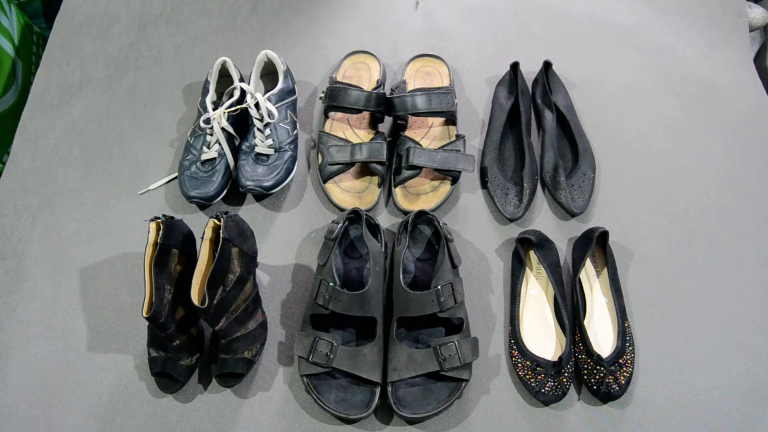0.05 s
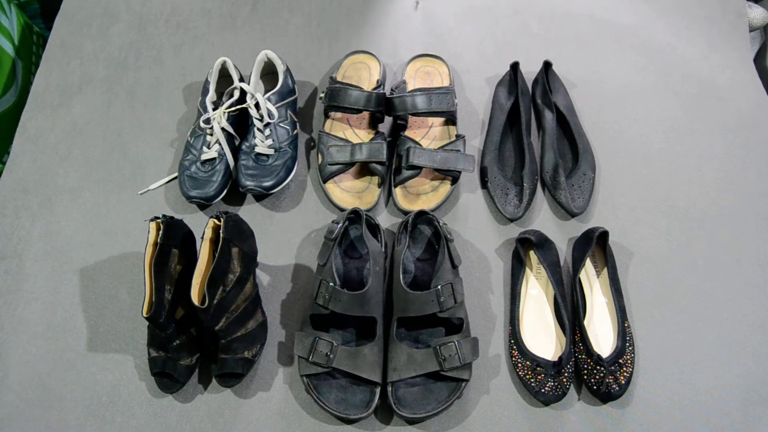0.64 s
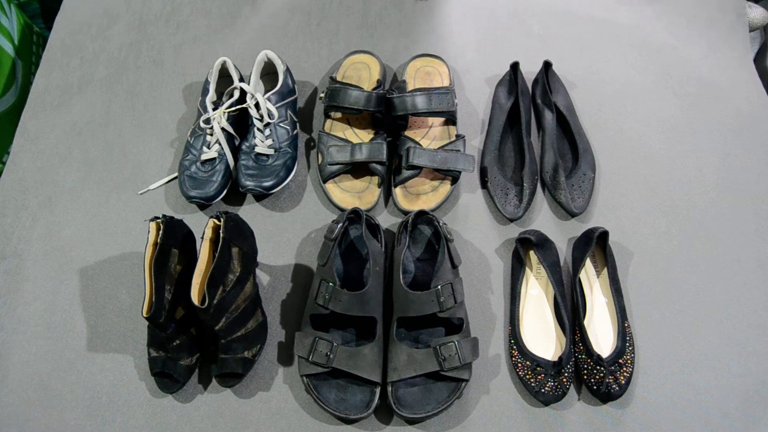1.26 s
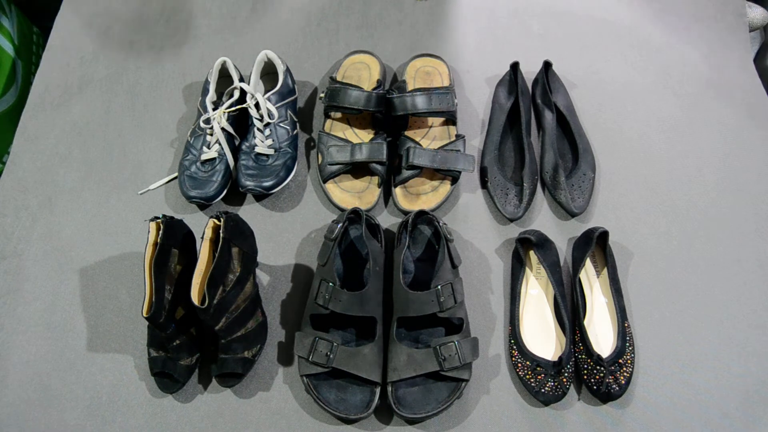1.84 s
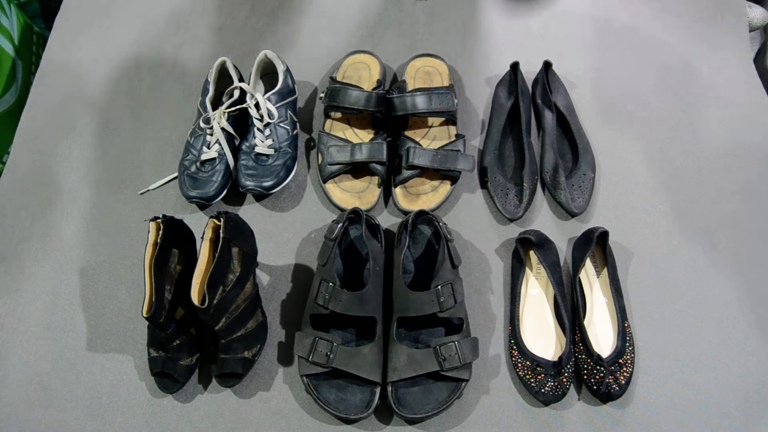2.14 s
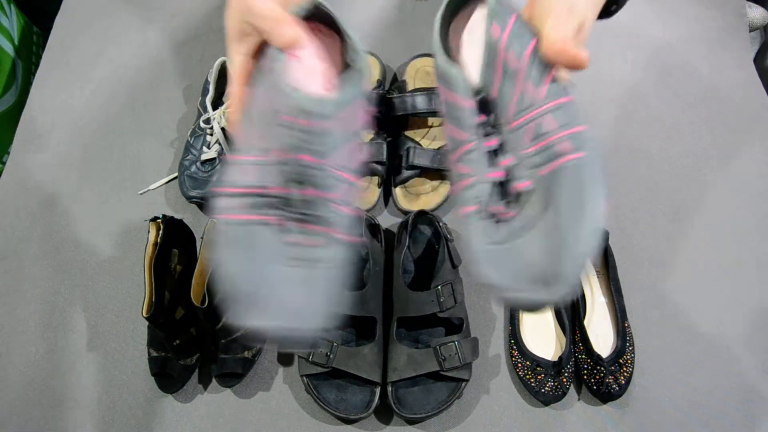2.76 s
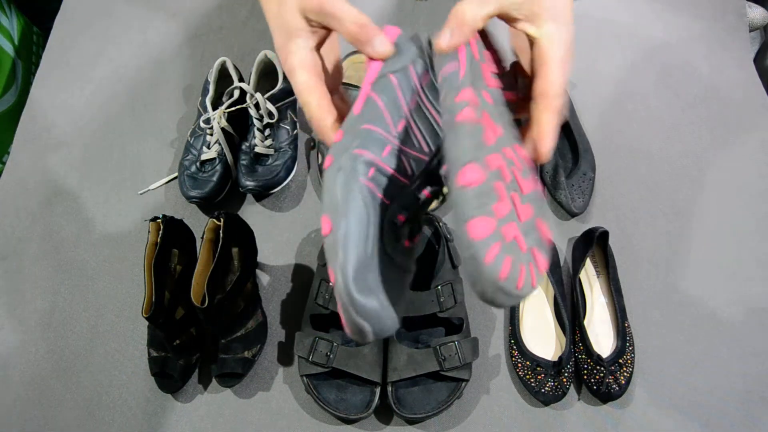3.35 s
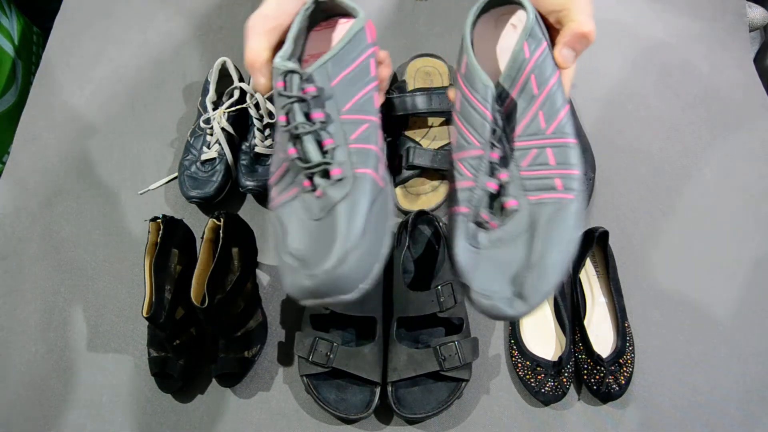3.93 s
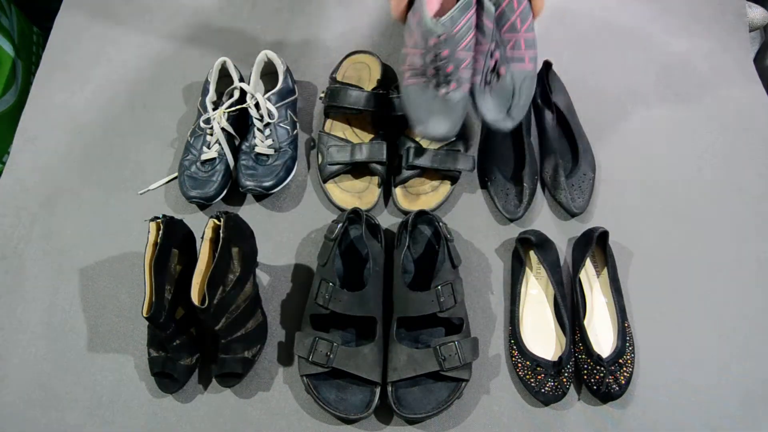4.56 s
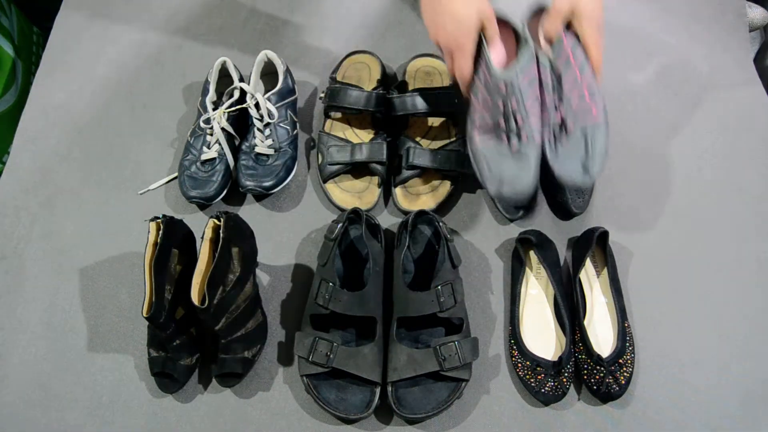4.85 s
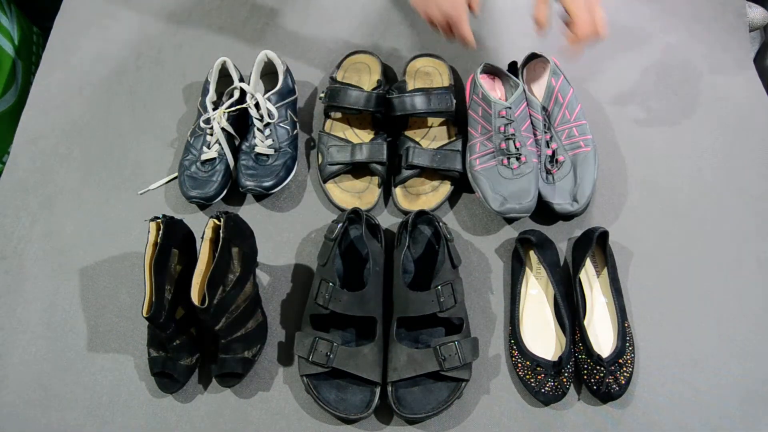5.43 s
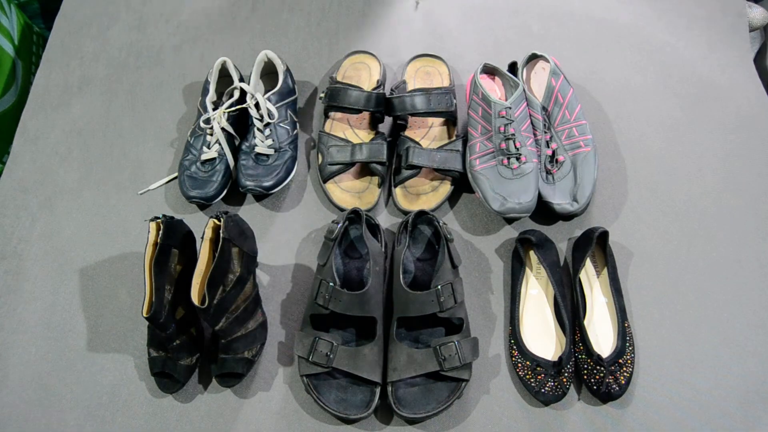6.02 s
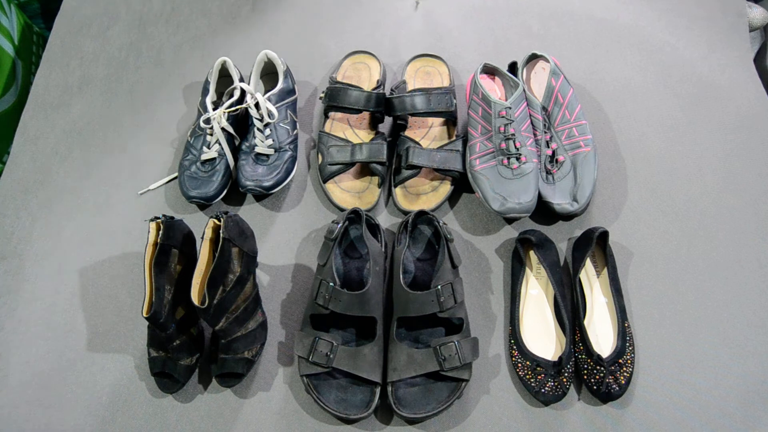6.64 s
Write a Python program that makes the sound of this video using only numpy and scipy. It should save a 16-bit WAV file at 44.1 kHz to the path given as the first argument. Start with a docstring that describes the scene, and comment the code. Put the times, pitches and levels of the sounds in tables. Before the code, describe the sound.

A pair of soft rubber-soled shoes is handled close by in a small, quiet room, with sleeves swishing softly at every reach. In the first half second the shoes are picked up with a cluster of hollow knocks and scuffs. Faint dull bumps and rubbing continue until about 1.7 seconds, and a single knock comes just after 2 seconds. Near 2.8 seconds the shoes are clapped together with a short, hollow pop, the loudest sound. They are turned over with quiet rubbing, then a few light knocks around 4 seconds and a sharp click. At about 4.9 seconds the soles patter onto a table, whose top gives a brief low shudder. Sleeves swish again around 5.5 seconds. From 6 seconds on there is more scuffing, a few dull bumps and two crisp ticks of lace toggles, near 6.1 and 6.5 seconds.

```python
"""A pair of soft rubber-soled shoes is handled in a small, quiet room; sleeves swish with every reach.
First the shoes are picked up, knocking and scuffing. Near 2.8 s they are clapped together with a pop:
the air inside them rings while the soles slap. They are turned over with more knocks and a sharp click.
Near 4.9 s they are set down, and the soles patter onto a table and shake its top.
Last come more rubbing, a few dull bumps and the ticks of lace toggles and fastenings."""
import sys
import numpy as np
from scipy import signal
from scipy.fft import rfft, irfft, next_fast_len
from scipy.io import wavfile

SR = 44100
rng = np.random.default_rng(int(sys.argv[2]) if len(sys.argv) > 2 else 0)


def unload_wav(signal):
    """Save mono or channel-first audio to the path in sys.argv[1] as 16-bit WAV at rate SR, clipped to [-1, 1]."""
    wavfile.write(
        sys.argv[1],
        SR,
        np.round(np.clip(np.atleast_2d(signal).T, -1, 1) * 32767).astype(np.int16),
    )


N = 294588
TIME = np.arange(N) / SR
HIT_TIME = TIME[:SR // 2]   # half a second, long enough for one hit to die away


def from_db(db):
    """Turn decibels into a number to multiply by."""
    return 10 ** (np.asarray(db) / 20)


def rms_one(x):
    """Scale a sound so its average strength (rms) is 1."""
    return x / np.sqrt(np.mean(x ** 2) + 1e-20)


def peak_one(x):
    """Scale a sound so its biggest swing is 1."""
    return x / (np.abs(x).max() + 1e-20)


def add(out, start_s, sound):
    """Mix a sound into out, beginning at start_s."""
    at = max(0, round(start_s * SR))
    out[at:at + len(sound)] += sound[:max(0, N - at)]


def keep_band(x, kind, edge_hz, order=2):
    """Let the "low", "high" or middle ("band") pitches through."""
    return signal.sosfilt(signal.butter(order, edge_hz, kind, fs=SR, output="sos"), x)


def colour(x, spectrum, tilt_db=0):
    """Shape the tone with (pitch_hz, level_db) points; tilt_db brightens it by that much per octave."""
    size = 2 * next_fast_len(len(x) // 2 + 2048)
    octave = np.log2(np.maximum(np.arange(size // 2 + 1) * SR / size, 10))
    hz, db = np.transpose(spectrum)
    gain = from_db(np.interp(octave, np.log2(hz), db) + tilt_db * (octave - 10))
    # these steps keep the filter from sounding before the hit (minimum phase)
    cepstrum = irfft(np.log(gain))
    cepstrum[1:size // 2] *= 2
    cepstrum[size // 2 + 1:] = 0
    return irfft(rfft(x, size) * np.exp(rfft(cepstrum)))[:len(x)]


def fade(fade_s):
    """A level that drops by 60 dB in fade_s seconds."""
    return np.exp(-np.log(1000) * HIT_TIME / fade_s)


def ring(pitch_hz, fade_s):
    """One pure tone that dies away."""
    return np.sin(2 * np.pi * pitch_hz * HIT_TIME) * fade(fade_s)


def swell(t, rise_s, fall_s):
    """A stroke gathers speed up to t = 0 and slows down again."""
    width_s = np.where(t < 0, rise_s, fall_s)
    return np.exp(-np.minimum((t / width_s) ** 2, 50))


def slips(count, per_s, spread_db):
    """Rubbing is a stream of tiny slips of uneven size."""
    sizes = from_db(spread_db * np.minimum(rng.exponential(1, count), 4))
    return rms_one(sizes * rng.standard_normal(count) * (rng.random(count) < per_s / SR))


def contact(spectrum, fade_s, crumble, tilt_db=0):
    """A first sharp touch, then a brief crush of smaller ones."""
    force = crumble * rng.standard_normal(len(HIT_TIME)) * fade(fade_s)
    force[0] += 1
    return peak_one(colour(force, spectrum, tilt_db))


def gliding_band(noise, pitch_hz, width_hz):
    """Keep only the part of a noise that lies around a moving pitch."""
    turn = np.exp(2j * np.pi * np.cumsum(pitch_hz) / SR)
    return rms_one((keep_band(noise / turn, "low", width_hz / 2) * turn).real)


def still_air():
    """The faint, steady hush of the room."""
    # tone of the hush: pitch_hz, level_db
    hush_tone = [(25, -1.5), (80, -7.5), (160, -2.5), (350, 3.5), (700, 2.5), (1500, -5), (3000, -9.5),
                 (6000, -18.5), (10000, -21)]
    return from_db(-65.5) * rms_one(colour(rng.standard_normal(N), hush_tone))


def room(x):
    """Sound bounces off two close surfaces, scatters off the things around and leaves a faint tail."""
    # echoes from the close surfaces: delay_s, level_db
    echoes = [(.0066, -24.5), (0.0155, -27)]
    out, count = np.zeros(N), len(HIT_TIME)
    build_up = 1 - np.exp(-(HIT_TIME / 0.0017) ** 2)
    scatter = (fade(0.18) + from_db(-14) * fade(0.2)) * build_up
    for start in range(0, N, count // 2):   # a fresh scatter each time, since the shoes move
        tail = rng.standard_normal(count) * scatter
        bounces = from_db(-6.5) * tail / np.sqrt(np.sum(tail ** 2))
        for delay_s, level_db in echoes:
            bounces[round(delay_s * SR)] += from_db(level_db)
        stretch = x[start:start + count]
        add(out, start / SR, signal.fftconvolve(stretch * np.hanning(count)[:len(stretch)], bounces))
    return x + keep_band(out, "low", 7000, order=1)


def sleeves():
    """Fine cloth slides in a smooth hiss that swells with each reach and grows brighter with speed."""
    # reaches of an arm: fastest_s, level_db, rise_s, fall_s
    reaches = [(.17, -44.5, 0.078, 0.17), (.5, -55, 0.18, 0.22), (.84, -53.5, 0.099, 0.19),
               (1.1, -51.5, 0.22, 0.18), (1.41, -54.5, 0.12, 0.079), (2.032, -51, 0.5, 0.33),
               (2.5, -59.5, 0.13, 0.45), (2.96, -57.5, 0.11, .1), (3.27, -60.5, 0.15, 0.063),
               (3.725, -64, 0.085, 0.057), (4.03, -59.5, 0.22, .2), (4.371, -53.5, 0.23, 0.17),
               (4.81, -53.5, 0.23, 0.18), (5.08, -65.5, .07, .08), (5.27, -62.5, 0.11, .1),
               (5.5, -51.5, 0.15, 0.17), (5.68, -50, 0.11, 0.16), (6.22, -55, 0.46, .24),
               (6.68, -53.5, 0.11, .1)]
    # tone of sliding cloth: pitch_hz, level_db
    cloth_tone = [(100, -24), (250, -11.5), (600, -2.5), (1100, 0), (1800, 0.5), (2600, -1), (4300, -4),
                  (6500, -11), (10000, -14.5)]
    # a band of hiss that glides through two long swishes: time_s, pitch_hz, relative_db
    glide_path = [(1.70, 1600, -23), (1.80, 1800, -2.5), (1.89, 2130, 2), (1.98, 2340, -11),
                  (2.2, 2700, -25), (5.40, 2440, -16), (5.53, 2500, -6.5), (5.67, 2730, -6.5),
                  (5.73, 1780, -4.5), (5.84, 1490, -28)]
    power = sum((from_db(db) * swell(TIME - s, rise, fall)) ** 2 for s, db, rise, fall in reaches)
    level_db = 10 * np.log10(power)
    speed = np.clip((level_db + 59) / 13, 0, 1)   # 0 is slow, 1 is fast
    weave = slips(N, per_s=20000, spread_db=1.0)
    slow_rub = rms_one(colour(weave, cloth_tone, tilt_db=-1.94))
    fast_rub = rms_one(colour(weave, cloth_tone))
    time_s, pitch_hz, relative_db = np.transpose(glide_path)
    glide = gliding_band(rng.standard_normal(N), np.interp(TIME, time_s, pitch_hz), width_hz=870)
    glide *= from_db(np.interp(TIME, time_s, relative_db))
    return from_db(level_db) * ((1 - speed) * slow_rub + speed * fast_rub + glide)


def scuffs():
    """Rubber and fabric rub in coarse slips; each rub swells, then fades a little more slowly."""
    # rubs of the shoes: loudest_s, level_db (before the lift), rise_s, tilt_db (per octave)
    rubs = [ (.03, -52.5, 0.11, -2), (.222, -45.5, 0.031, 1.2), (.295, -47.5, 0.026, .5),
            (.353, -39.5, .015, -1.5), (.388, -40.5, .018, -1), (.435, -48.5, .017, -2.5),
            (.772, -52.5, 0.011, .5), (.84, -51.5, .04, -1.5), (1.058, -46, 0.024, -2.5),
            (1.118, -45, .013, -5), (1.203, -50, 0.016, -0.5), (1.707, -47.5, .019, 0),
            (2.629, -56.5, 0.017, -1), (2.775, -54, 0.057, 0), (3.012, -52, 0.026, -1),
            (3.07, -56.5, .018, -1.5), (3.218, -55, .025, -2), (3.335, -62.5, .021, 2.5),
            (3.826, -58, .011, -1), (3.862, -62.5, 0.011, -.5), (3.928, -48, 0.0055, -.5),
            (3.952, -53, 0.016, -0.5), (4.106, -47, .01, -1.5), (4.125, -55, 0.016, -1.5),
            (4.926, -45.5, 0.011, 3), (5.782, -46.5, .015, -4), (6.014, -58, 0.0066, 5),
            (6.088, -50.5, 0.037, 1.5), (6.184, -40, .025, 0), (6.269, -53, 0.18, 11.5),
            (6.393, -47, .009, 0.5), (6.412, -43, 0.012, 0), (6.44, -42.5, 0.017, 0.7),
            (6.515, -51.5, 0.057, 1), (6.608, -50, 0.0068, 2.5), (6.66, -55, 0.042, 3.5)]
    # tone of a rubbing shoe: pitch_hz, level_db
    rub_tone = [(70, -20.5), (200, -8), (450, 4.5), (800, 1), (1300, 3), (2500, -2), (4500, -6.5),
                (7000, -10), (10000, -11.5)]
    out, lift_db = np.zeros(N), 1.5
    for loudest_s, level_db, rise_s, tilt_db in rubs:
        fall_s = 1.31 * rise_s
        t = TIME[(TIME > loudest_s - 3 * rise_s) & (TIME < loudest_s + 3 * fall_s)] - loudest_s
        grain = rms_one(colour(slips(len(t), per_s=5500, spread_db=1.3), rub_tone, tilt_db))
        add(out, loudest_s + t[0], from_db(level_db + lift_db) * swell(t, rise_s, fall_s) * grain)
    return out


def bumps():
    """A soft, drawn-out push into a shoe that barely rings, with a deep thud beneath."""
    # dull bumps and shuffles: start_s, level_db, pitch_hz
    pushes = [(.146, -45, 355), (0.216, -36.5, 453), (0.329, -45, 262), (.51, -50.5, 270), (.791, -40, 330),
              (1.102, -39, 403), (1.156, -38.5, 445), (1.199, -48, 270), (1.24, -43, 494),
              (1.503, -48.5, 484), (1.576, -45.5, 497), (1.679, -50, 298), (2.304, -53, 280),
              (2.825, -40, 494), (3.225, -47, 470), (3.265, -48.5, 487), (4.062, -43, 312),
              (4.487, -51, 355), (5.05, -48.5, 820), (5.77, -48.5, 247), (6.153, -44, 240),
              (6.213, -43, 1290), (6.417, -44.5, 390), (6.596, -47.5, 417)]
    # tone of the thud: pitch_hz, level_db
    thud_tone = [(40, -14.5), (80, -17.5), (120, -7), (155, -3), (210, 0.5), (400, -29.5), (2000, -42.5)]
    out, push_s = np.zeros(N), 0.041
    for start_s, level_db, pitch_hz in pushes:
        push = rng.standard_normal(len(HIT_TIME)) * np.exp(-(HIT_TIME / push_s) ** 2) + 1e-18
        body = peak_one(keep_band(push, "band", [pitch_hz / 1.38, pitch_hz * 1.356]))
        thud_db = -8.5 - 16.5 * np.log2(pitch_hz / 363)   # lower bumps thud more
        thud = from_db(thud_db) * peak_one(colour(push, thud_tone))
        add(out, start_s, from_db(level_db) * (body + thud))
    return out


def ticks():
    """Hard little lace toggles and fastenings click without ringing."""
    # clicks: start_s, level_db, tilt_db (per octave)
    clicks = [(0.288, -38, 0), (2.7774, -31, -12), (4.0936, -18.5, -7), (5.894, -34, -7.5), (6.072, -22, 3),
              (6.518, -22, 3)]
    # tone of a click: pitch_hz, level_db
    click_tone = [(200, -36), (600, -1), (1500, 10), (4000, 12), (7000, 20), (10000, 19.5)]
    out = np.zeros(N)
    for start_s, level_db, tilt_db in clicks:
        click = contact(click_tone, fade_s=0.0035, crumble=0.18, tilt_db=tilt_db)
        add(out, start_s, from_db(level_db) * click)
    return out


def table_top():
    """The shaken table top hums with several low tones, in a new mix each time."""
    # tones of the top: pitch_hz, level_db, fade_s
    tones = [(79.5, -12, 0.33), (132.6, -12, 0.27), (154.4, 0.5, 0.21), (189, -3, 0.2), (282.5, -8, 0.28),
             (335, -6, 0.098), (457, -3, 0.12), (485.5, -15, 0.071), (748, 4, 0.056)]
    hum = sum(from_db(db + rng.normal(0, 2.7)) * ring(hz, fade_s) for hz, db, fade_s in tones)
    build_up = 1 - np.exp(-HIT_TIME / 0.0042)   # the heavy top takes a moment to move
    return peak_one(hum * build_up)


def patter():
    """Four ridges of a sole touch down in turn, each more softly than the last."""
    # tone of rubber hitting the table: pitch_hz, level_db
    rubber_tone = [(60, -34), (200, -1), (450, 4), (700, -1), (1250, 1), (1900, -5.5), (2600, -18),
                   (4500, -23), (7000, -22), (10000, -26)]
    gap_s, loss_db = 0.0066, 4
    out = np.zeros(N)
    for ridge in range(4):
        sole = from_db(3.5) * ring(pitch_hz=452, fade_s=0.032)
        tap = contact(rubber_tone, fade_s=0.061, crumble=0.52)
        add(out, gap_s * (ridge + rng.normal(0, 0.046)), from_db(-loss_db * ridge) * (sole + tap))
    return out[:len(HIT_TIME)]


def landings():
    """Each part of a sole that lands patters on the table top and shakes it."""
    # touchdowns: start_s, level_db, shake_db (compared with a usual shake)
    touchdowns = [(4.901, -31, -9), (4.9104, -31.5, -6), (4.917, -26.5, 4), (4.9421, -27.5, -3),
                  (4.969, -43, -8)]
    out, usual_shake_db = np.zeros(N), -8.5
    for start_s, level_db, shake_db in touchdowns:
        shake = from_db(usual_shake_db + shake_db) * table_top()
        add(out, start_s, from_db(level_db) * (patter() + shake))
    return keep_band(out, "high", 100)   # a flat board gives off little deep bass


def knock(level_db, pitch_hz, contact_s, slap_db):
    """The air in a struck shoe rings briefly, with a weak higher tone, while the sole slaps."""
    # tone of a slapping sole: pitch_hz, level_db
    slap_tone = [(100, -48), (200, -5), (300, -8), (600, 5), (1100, -0.5), (2000, -4.5), (3800, -12),
                 (6000, -25), (10000, -34.5)]
    # a shorter, firmer contact stops the ringing sooner and slaps brighter
    firmness = (0.0016 / contact_s) ** 0.29
    fade_s = 0.03 / firmness
    air = ring(pitch_hz, fade_s) + from_db(-22.5) * ring(pitch_hz * 1.7, fade_s)
    extra_octaves = 0.03 * max(level_db + 30, 0)   # hits above -30 dB are brighter still
    top_hz = min(1400 * firmness * 2 ** extra_octaves, SR / 3)
    slap = keep_band(contact(slap_tone, fade_s=0.038, crumble=0.35), "low", top_hz)
    press = 1 - np.exp(-HIT_TIME / contact_s)
    return from_db(level_db) * (peak_one(air * press) + from_db(slap_db) * peak_one(slap * press))


def knocks():
    """The hollow shoes knock; each time the sole bounces and touches again, higher and less sharply."""
    # hits: start_s, level_db, pitch_hz, contact_s, slap_db, bounce_db (last two relative to level_db)
    hits = [ (0.3228, -27, 523, 0.00063, -13, -14), (0.3365, -31.5, 468, 0.00079, -2, 0.5),
            (.345, -37, 984, .002, -10, -19), (0.363, -34.5, 1035, 0.0028, -13, -20),
            (0.378, -33, 853, .002, -1, -6), (0.5089, -26.5, 679, 0.00097, -10, -5),
            (2.147, -24, 545, 0.00023, -9, -6), (2.7772, -33, 520, 0.00024, -4, -10),
            (2.7878, -15, 453, 0.00036, -2.5, -14), (2.7965, -24, 800, .0012, -2, -10),
            (2.8077, -29, 440, 0.00067, -1, -6), (2.823, -35, 453, 0.0046, -16, -16),
            (3.635, -46, 530, 0.00054, -1, -14), (3.66, -52, 530, .001, -5, -12),
            (3.745, -45, 1230, 0.000073, -1, -6), (3.9135, -47, 1140, 0.0013, -12, -3),
            (3.9241, -26.5, 1171, 0.0011, -12.5, -8.5), (3.941, -38, 1123, 0.0015, -14, -13),
            (4.0137, -27, 715, 0.00013, -12.5, -9), (4.0647, -49, 605, 0.002, 10, -2),
            (4.0757, -38.5, 760, 0.00044, -2.5, -0.5), (4.087, -41, 626, 0.00098, -4.5, 3),
            (4.325, -46, 950, .0025, -2, -10), (4.923, -28.5, 1146, 0.00099, 8, -9),
            (4.9308, -29.5, 733, 0.00088, -5, -2), (6.6014, -47.5, 920, 0.000089, 5.5, -9)]
    out, bounce_s = np.zeros(N), 0.0075
    for start_s, level_db, pitch_hz, contact_s, slap_db, bounce_db in hits:
        add(out, start_s, knock(level_db, pitch_hz, contact_s, slap_db))
        bounce = knock(level_db + bounce_db, pitch_hz * 1.16, contact_s * 1.8, slap_db)
        add(out, start_s + bounce_s, bounce)
    return keep_band(out, "high", 245)   # a small body gives off little bass


def scene():
    """All the handling sounds echo in the room, over still air."""
    handling = knocks() + landings() + bumps() + ticks() + scuffs() + sleeves()
    return (still_air() + room(handling))[None]


def record(dry):
    """A small microphone: thin bass, a dip in the treble and a steep cut of the highest pitches."""
    # tone of the microphone: pitch_hz, level_db
    microphone_tone = [(20, -6), (7000, 3), (7600, 1.5), (7900, -4.5), (8400, 4), (9600, 5.5),
                       (10400, -1.5), (11000, -10), (11600, -21)]
    sound = keep_band(colour(dry[0], microphone_tone), "high", 70)
    top_cut = signal.ellip(10, 0.2, 70, 11550, fs=SR, output="sos")
    return signal.sosfilt(top_cut, sound)[None]


dry = scene()
out = record(dry)
unload_wav(out)
```